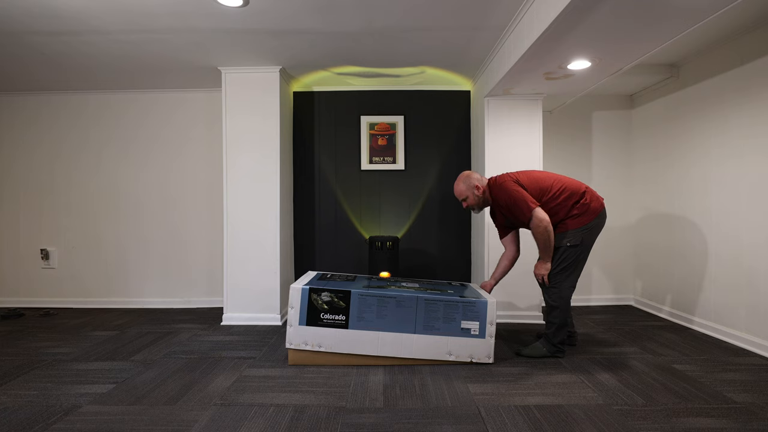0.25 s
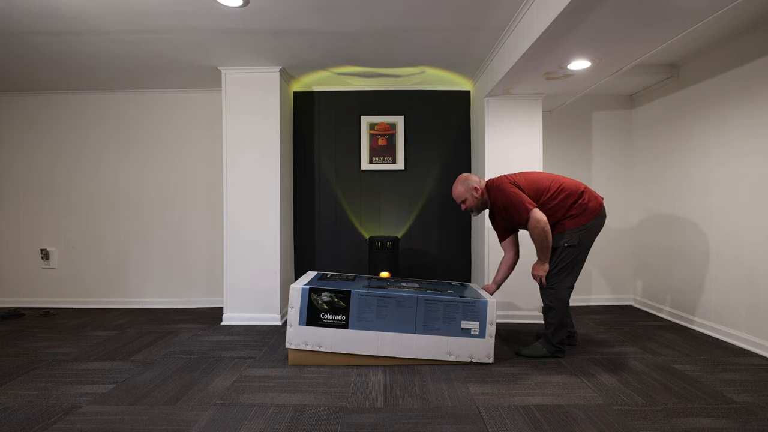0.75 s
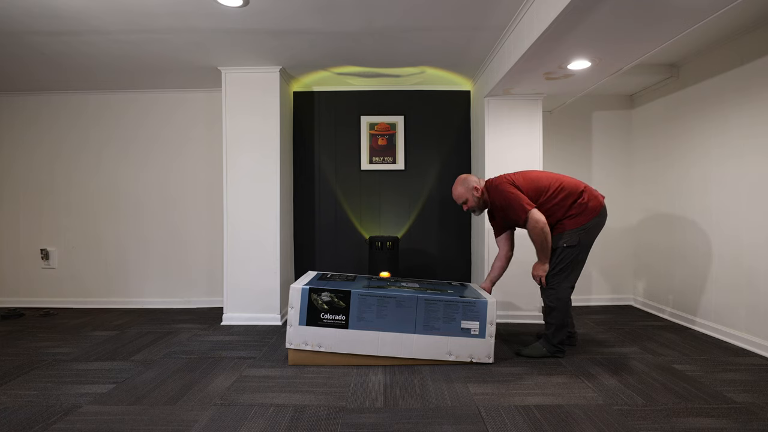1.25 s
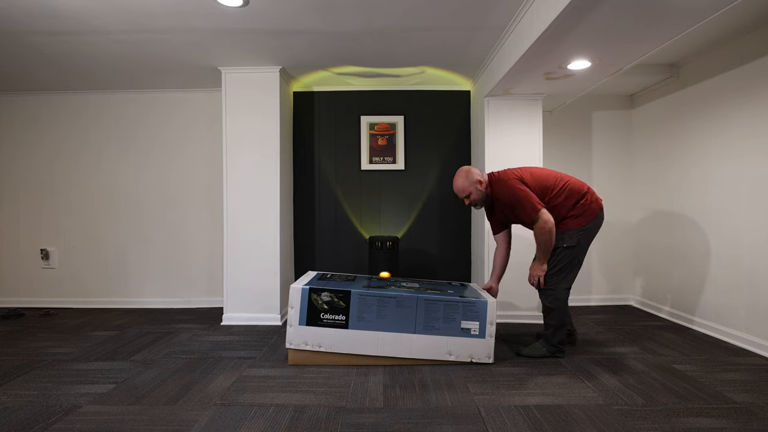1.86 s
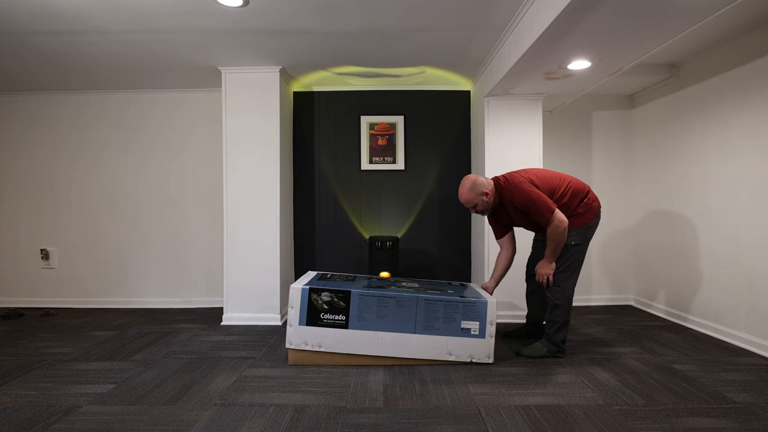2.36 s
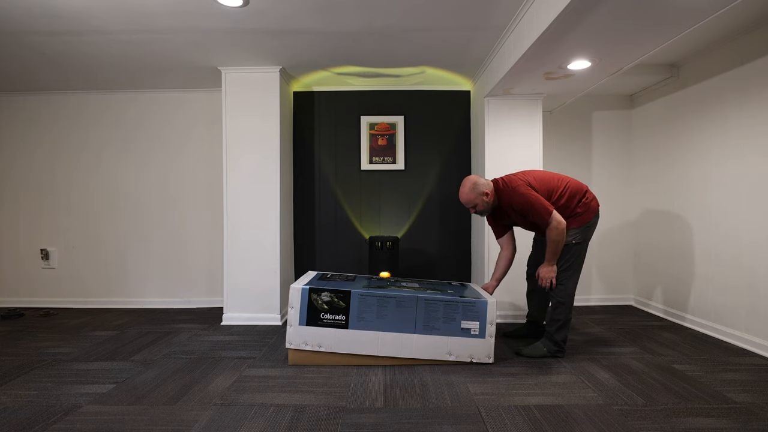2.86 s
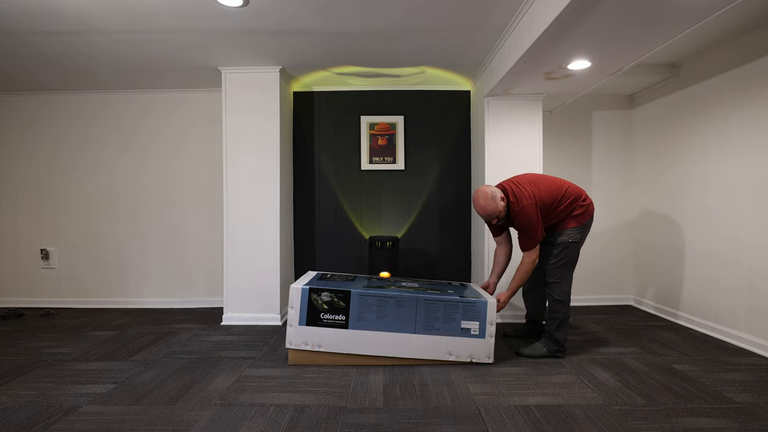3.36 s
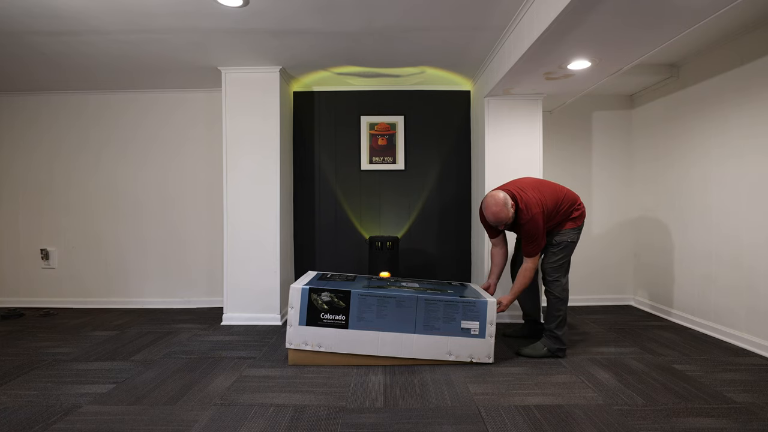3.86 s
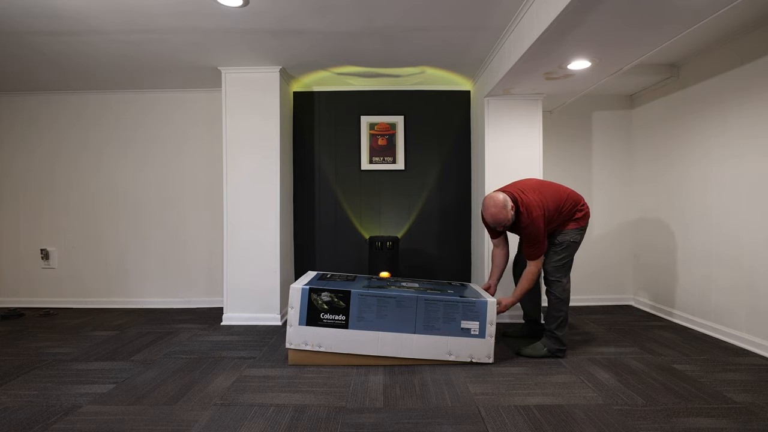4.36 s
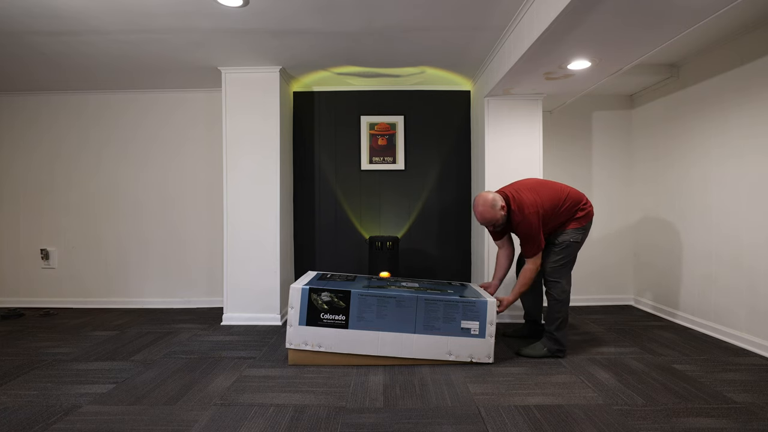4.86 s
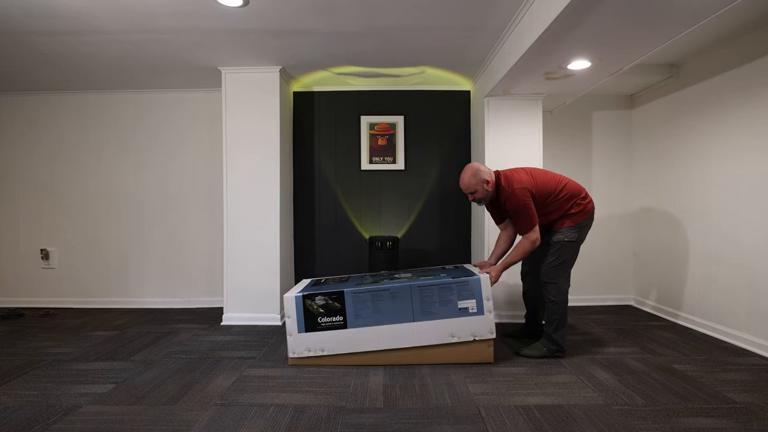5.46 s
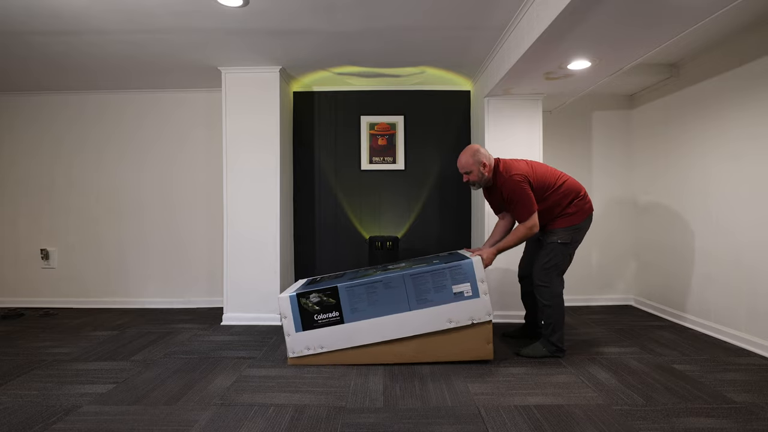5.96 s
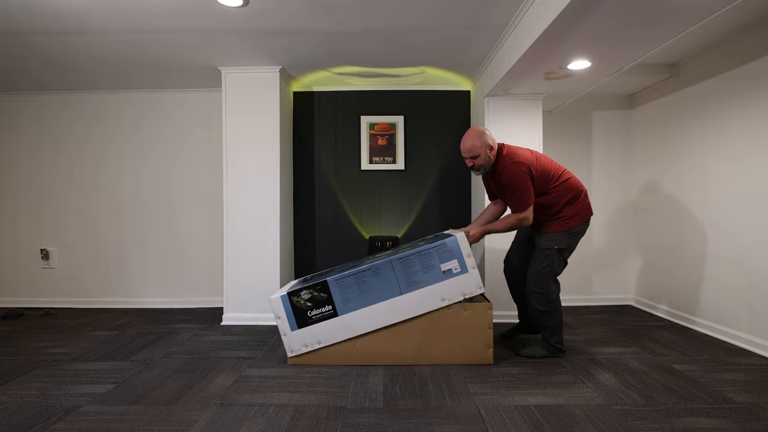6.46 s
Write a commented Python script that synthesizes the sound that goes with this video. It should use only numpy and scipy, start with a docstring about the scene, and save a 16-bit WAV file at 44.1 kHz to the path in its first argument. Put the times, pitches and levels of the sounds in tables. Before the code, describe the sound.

A large cardboard box is handled in a bare, low, carpeted room, heard from a few metres away. Uneven knocks, dry paper snaps and faint rustling come in loose clusters with quieter gaps. After about five seconds the snug lid is tugged upward in rasping jerks, with hollow booms, deep air flutter and tiny edge squeaks.

```python
"""A large cardboard box is worked open on a carpeted floor, a few metres off in a bare, low room.
Knocks, paper snaps and hollow thumps are bursts of tiny clicks ringing through damped panel modes.
Tugs on the lid, rubbing and rustling are coloured clicks; edge squeaks are short stacks of overtones.
A loose panel shudders, the lid pumps a deep flutter of air, and faint air noise and a drone lie beneath."""
import sys
import numpy as np
from scipy import signal
from scipy.fft import rfft, irfft
from scipy.io import wavfile
from scipy.ndimage import uniform_filter1d

SR = 44100
rng = np.random.default_rng(int(sys.argv[2]) if len(sys.argv) > 2 else 0)


def dump(signal):
    """Clip the signal to [-1, 1] and save it as 16-bit WAV at the path in sys.argv[1]."""
    limited = np.clip(np.atleast_2d(signal).T, -1, 1)
    pcm = np.round(limited * 32767).astype(np.int16)
    wavfile.write(sys.argv[1], SR, pcm)


N = 295911
TIME = np.arange(N) / SR

# Hands knock on a panel; buckling brings up boom, clack and crack, an edge brings up the clack:
# (time [s], contact time [s], relative level [dB], buckling [dB], extra edge clack [dB])
PANEL_KNOCKS = [(0.158, 0.0014, -27.5, 0, -2), (0.309, 0.0035, -21, 2, -2), (0.341, 0.0029, -27.5, 7.5, 5),
                (0.414, 0.0039, -20.5, -1, -1), (0.452, 0.0022, -12.5, -4, -4), (0.622, .004, -34, -7, 3),
                (0.735, 0.0022, -38, 2, -3.5), (0.843, .002, -40, -6, 5), (0.962, 0.011, -37, -10, 4),
                (1.686, .0025, -17.5, 8.5, 2), (1.824, 0.0044, -22.5, 7, -4),
                (2.222, 0.0071, -29, 1.5, -5.5), (2.258, 0.0056, -26.5, -5, 5),
                (2.508, 0.0019, -25.5, -3, -1), (2.559, 0.0045, -25, -0.5, 4.5),
                (2.672, 0.0039, -24, 3.5, -5), (2.689, 0.0027, -19.5, -1, 4),
                (3.062, 0.0058, -17.5, 5.5, -2.5), (3.367, 0.0049, -29, 8, -2),
                (3.967, 0.00084, -43.5, -6.5, 14), (4.349, 0.0051, -22, 12, -1.5),
                (4.367, 0.002, -15, -6, 4.5), (6.489, 0.0019, -12, -0.5, 0.5)]
# The paper skin snaps under a flap or a fingertip:
# (time [s], contact time [s], relative level [dB], crack brightness [dB])
PAPER_SNAPS = [(1.4352, .0003, -20.5, -0.5), (1.834, 0.0014, -25, 2.5), (2.079, 0.0011, -52, 17),
               (2.256, 0.0026, -26.5, -6), (2.632, 0.0032, -29.5, -4.5), (3.89, 0.0013, -38.5, -3.5),
               (4.05, 0.0034, -45, -6), (4.278, 0.0057, -46.5, 8), (4.572, .0019, -26.5, -13.5)]
# Lid and tray bump and the hollow box booms: (time [s], relative level [dB], hardness [dB])
LID_THUMPS = [(1.07, -38.5, -13), (2.081, -24, -1.5), (4.794, -28, -12), (4.846, -29.5, -0.5),
              (4.918, -28.5, 5.5), (5.089, -14.5, 1.5), (5.375, -18, 6.5), (5.51, -16.5, -3),
              (5.724, -14, -3), (5.921, -23, -4), (6.088, -23.5, 5), (6.113, -19.5, 6), (6.15, -18, -1),
              (6.372, -17.5, -5), (6.422, -17.5, 4.5), (6.514, -21.5, -10), (6.582, -16.5, 1)]
# Damped modes of the box: (frequency [Hz], bandwidth [Hz], relative level [dB])
BOX_MODES = [(57, 22, -13), (90, 22, -1.5), (128, 35, 0.5), (171, 52, 0.5), (210.6, 77, -2), (257.5, 39, 4),
             (327, 49, 2), (426, 38, 0.5), (512, 42, -9), (690, 110, -11.5), (840, 150, -15.5),
             (966, 200, -10.5), (1140, 135, -8.5), (1400, 210, -14), (1565, 210, -14), (1880, 170, -22)]
# Colour of cracking paper: (frequency [Hz], level [dB])
CRACK_COLOUR = [(1000, -27.5), (1650, -5.5), (2300, -1), (3100, 1.5), (4200, 2.5), (5300, -3.5),
                (6500, -0.5), (9300, -4), (12000, -11.5), (16000, -25)]
# Tugs on the lid, board sliding on board:
# (start [s], fastest [s], stop [s], relative level [dB], brightness [dB])
LID_TUGS = [(5.048, 5.112, 5.168, -14.5, -4), (5.334, 5.358, 5.5, -25, -2.5),
            (5.557, 5.584, 5.71, -24.5, -6), (5.858, 5.948, 6.07, -23.5, -2), (6.07, 6.145, 6.23, -28, -14),
            (6.17, 6.224, 6.3, -21, 1.5), (6.395, 6.469, 6.535, -17.5, 3.5)]
# Hands rub over the paper: (fastest [s], length [s], relative level [dB])
PAPER_RUBS = [(0.0, 0.11, -42), (0.14, .07, -33), (0.413, .09, -29), (1.279, .08, -43.5), (1.377, .04, -35),
              (2.367, 0.088, -36.5), (3.062, .04, -28), (3.367, 0.055, -38), (3.439, 0.14, -44),
              (4.106, 0.037, -44), (4.326, .08, -49), (4.518, .17, -35.5), (4.76, 0.12, -38.5),
              (4.898, 0.089, -39.5), (6.622, .2, -39.5)]
# Colour of the sliding rasp: (frequency [Hz], level [dB])
RASP_COLOUR = [(120, -2.5), (300, 5.5), (700, -0.5), (1500, -2.5), (2600, -2.5), (3300, -2.5), (4200, 1),
               (5300, -5), (6500, -3), (9500, -5.5), (12500, -11.5), (16000, -22)]
# Let go after a hard knock, a loose panel shudders and settles: (start [s], length [s], level [dB])
PANEL_SHUDDERS = [(0.504, .15, -39), (1.716, 0.17, -26.5), (2.71, 0.14, -31.5), (4.415, 0.13, -22)]
# Colour of the shudder: (frequency [Hz], level [dB])
SHUDDER_COLOUR = [(100, -18), (280, 4.5), (480, 2), (700, -5.5), (1300, -6.5), (1900, -24), (6000, -38)]
# A board edge squeaks: (time [s], length [s], pitch [Hz], level [dB], waver [share of pitch])
EDGE_SQUEAKS = [(3.327, 0.02, 1371, -24, 0.06), (5.62, 0.042, 4479, -38, 0),
                (5.96, 0.042, 4791, -26.5, 0.06)]
# The box shifting under the hands: (time [s], relative flexing [dB], relative rustle [dB])
BOX_HANDLING = [(0.0, -29, -38), (0.25, -41, -51), (0.55, -32.5, -39.5), (0.8, -42, -53.5),
                (1.0, -33.5, -52), (1.17, -46, -53), (1.35, -39, -53), (1.85, -33, -45), (2.15, -42, -49.5),
                (2.45, -35, -40.5), (2.95, -44, -46), (3.45, -36.5, -37), (4.22, -49.5, -57),
                (4.6, -33.5, -46), (4.98, -34, -41.5), (5.2, -36.5, -33), (5.8, -33, -36),
                (6.3, -29, -34.5), (6.7, -25, -29.5)]
# Colour of the rustle: (frequency [Hz], level [dB])
RUSTLE_COLOUR = [(200, -6.0), (600, 2), (1400, -0.5), (2600, -5.5), (4300, -9.5), (9000, -13.5), (16000, -33)]
# Colour of the still air: (frequency [Hz], level [dB])
AIR_COLOUR = [(15, -30), (25, -5), (87, -25), (263, -19), (427, -6), (1700, -9), (2350, -12), (2990, -13),
              (4250, -16.5), (16000, -24)]
# Reverberation: (frequency [Hz], time to fall 60 dB [s])
REVERB_TIMES = [(80, 0.39), (220, 0.32), (560, 0.42), (1500, 0.4), (4000, 0.36), (8000, 0.27),
                (14000, 0.19)]

# How much of the box answers each blow: (hollow thump [dB], panel knock [dB], edge clack [dB], crack [dB])
KNOCK_MIX = (-9, 0, -5.5, -10.5)
SNAP_MIX = (-40, -12.5, -3.5, -0.5)
THUMP_MIX = (0, -7, -17, -21.5)
# What each dB of buckling or hardness adds to the same four [dB per dB]
BUCKLING, HARDNESS = (1, 0, 0.65, 1), (0, 0.97, 1, 1)


def knocks(ring):
    """Each blow crushes the flutes in a short burst of clicks that drives the box and cracks the paper."""
    out = np.zeros(N + SR)
    t = TIME[:SR * 3 // 4]
    attack = SR // 25  # levels are set over the first 40 ms
    spots = [room(direct_db=-6, bounce_db=-12) for _ in range(24)]
    for s, contact, levels, bright in blows():
        age = t / max(contact, 1 / SR)
        crunch = slips(len(t), 9000, 2.08) * np.sqrt(age) * np.exp(-age)
        crunch = crunch[:SR // 8]
        # the flutes give way at several spots of the panel, each with its own echoes
        nearby = rng.permutation(len(spots))[:9]
        spot = rng.choice(nearby, len(crunch))
        burst = sum(signal.fftconvolve(crunch * (spot == k), spots[k])[:len(t)] for k in np.unique(spot))
        body = through(burst, ring)
        thump = band(body, 53.0, 206)
        knock = band(body, 223, 693)
        clack = band(body, 774, 2060)
        crack = colour(burst, CRACK_COLOUR, bright + 2.9)
        start = int(s * SR)
        for part, db in zip((thump, knock, clack, crack), levels):
            out[start:start + len(t)] += undb(db) * unit(part, attack)
    return out[:N]


def blows():
    """Knocks, snaps and thumps as (time [s], contact time [s], four levels [dB], relative brightness [dB])."""
    hits = []
    for s, contact, db, buckle, edge in PANEL_KNOCKS:
        levels = db + np.array(KNOCK_MIX) + buckle * np.array(BUCKLING) + [0, 0, edge, 0]
        hits.append((s, contact, levels, -10 + 0.92 * buckle))  # buckling brightens the crack
    for s, contact, db, bright in PAPER_SNAPS:
        hits.append((s, contact, db + np.array(SNAP_MIX), bright))
    for s, db, hard in LID_THUMPS:
        levels = db + np.array(THUMP_MIX) + hard * np.array(HARDNESS)
        hits.append((s, 0.0036, levels, -8))
    return hits


def box_ring(dead_db=-9):
    """Heavily damped panel modes over the dead tap of the board itself."""
    t = TIME[:SR // 4]
    ring = np.zeros(len(t))
    for hz, width, db in BOX_MODES:
        decay = np.exp(-np.pi * width * t)  # the wider the mode, the faster it dies
        ring += undb(db) * 2 * np.pi * width / SR * decay * np.cos(2 * np.pi * hz * t)
    ring[0] += undb(dead_db)
    return ring


def strokes(rasp_db=1, judder_db=2.5, swell=1.09):
    """The rasp of tugs, rubs and scuffs follows the sliding speed, and judders as the grip varies."""
    out = np.zeros(N)
    grip = undb(judder_db * walk(110))
    rise, rub_bright_db = 0.42, 1.5  # share of a rub spent speeding up; treble lift
    rubs = [(s - rise * length, s, s + (1 - rise) * length, db, rub_bright_db)
            for s, length, db in PAPER_RUBS]
    # the hand scuffs the paper into and out of each knock
    reach_s, scuff_db = 0.016, -15  # time either side; level against the knock's
    scuffs = [(s - reach_s, s, s + reach_s, db + scuff_db, 0) for s, _, db, _, _ in PANEL_KNOCKS]
    for start, fastest, stop, db, bright in LID_TUGS + rubs + scuffs:
        speed = np.interp(TIME, [start, fastest, stop], [0, 1, 0])
        on = speed > 0
        rasp = unit(colour(slips(on.sum(), 7000, 3.75), RASP_COLOUR, bright))
        out[on] += undb(db + rasp_db) * speed[on] ** swell * rasp
    return out * grip


def shudders(fade_db=9):
    """A loose panel chatters against the tray as dull, fading clicks."""
    level = np.zeros(N)
    for s, length, db in PANEL_SHUDDERS:
        on = (TIME > s) & (TIME < s + length)
        progress = np.clip((TIME - s) / length, 0, 1)
        level += on * undb(db - fade_db * progress)
    return level * unit(colour(slips(N, 900, 3.0), SHUDDER_COLOUR))


def squeaks():
    """Stick-slip locks briefly into a pitch with overtones, wavering where the table says so."""
    out = np.zeros(N)
    drift = walk(900)
    for s, length, hz, db, waver in EDGE_SQUEAKS:
        on = (TIME > s) & (TIME < s + length)
        phase = 2 * np.pi * np.cumsum(hz * (1 + waver * drift[on])) / SR
        # the nearly square slip favours odd harmonics
        harmonics = np.arange(1, 11000 / hz)
        tone = sum((1 + k % 2) * np.sin(k * phase) / k ** 0.71 for k in harmonics)
        out[on] += undb(db) * unit(tone) * np.sqrt(np.hanning(on.sum()))
    return out


def handling(ring, flex_db=-2, rustle_db=-4, flutter_db=1.5):
    """Panels flex with a low grumble of clicks in the box while fingers and sleeves rustle over the paper."""
    s, flex_curve, rustle_curve = np.transpose(BOX_HANDLING)
    flex = undb(flex_db + np.interp(TIME, s, flex_curve))
    rustle = undb(rustle_db + np.interp(TIME, s, rustle_curve))
    boxed = through(slips(N, 500, 3.4), ring)
    grumble = unit(band(band(boxed, 27, 1600), 45, 590, order=1))
    crinkle = unit(colour(slips(N, 1500, 4.2), RUSTLE_COLOUR))
    return (flex * grumble + rustle * crinkle) * undb(flutter_db * walk(25))


def lid_draught(db=-32, lag_s=0.15):
    """Each tug pumps air between lid and tray: deep noise that lingers past the stroke."""
    speed = sum(np.interp(TIME, [start, fastest, stop + lag_s], [0, 1, 0])
                for start, fastest, stop, _, _ in LID_TUGS)
    return undb(db) * speed * unit(band(rng.standard_normal(N), 24, 77, order=2))


def still_room(db=-51, hum_hz=85, hum_db=-52):
    """Faint coloured air noise and a low drone of narrow-band noise."""
    air = unit(colour(rng.standard_normal(N), AIR_COLOUR))
    drone = unit(band(rng.standard_normal(N), hum_hz - 4, hum_hz + 4, order=2))
    return undb(db) * air + undb(hum_db) * drone


def room(direct_db=-7, bounce_db=-11, bounce_s=.0075, build_s=0.00037):
    """Direct sound, a bounce off the low ceiling, and a diffuse tail whose top treble dies soonest."""
    t = TIME[:SR * 3 // 4]
    hz = np.fft.rfftfreq(len(t), 1 / SR)
    noise = rfft(rng.standard_normal(len(t)))
    centres, t60s = np.transpose(REVERB_TIMES)
    tail = np.zeros(len(t))
    # overlapping bands of one noise, each with its own decay
    for share, t60 in zip(np.eye(len(centres)), t60s):
        band_noise = irfft(noise * lookup(np.c_[centres, share], hz), len(t))
        tail += band_noise * np.exp(-np.log(1000) * t / t60)
    tail *= 1 - np.exp(-t / build_s)
    tail /= np.linalg.norm(tail)
    # direct and bounce levels are relative to the tail
    tail[0] += undb(direct_db)
    tail[int(bounce_s * SR * rng.uniform(.75, 1.25))] += undb(bounce_db)
    return tail / np.linalg.norm(tail)


def slips(count, per_s, spread_db):
    """Fibres catching and letting go: random clicks of uneven size."""
    size = undb(spread_db * np.minimum(rng.exponential(size=count), 5))
    caught = rng.random(count) < per_s / SR
    return unit(size * rng.standard_normal(count) * caught)


def walk(per_s):
    """Slow smoothed chance, scaled to rms 1."""
    k = int(SR / per_s)
    steps = np.repeat(rng.standard_normal(N // k + 1), k)[:N]
    return unit(uniform_filter1d(steps, k))


def colour(x, points, bright_db=0, size=2048):
    """Minimum-phase filter of the given spectrum, with a treble shelf."""
    hz = np.fft.rfftfreq(size, 1 / SR)
    shelf = bright_db / (1 + (5800 / (hz + 1)) ** 4)
    cepstrum = irfft(np.log(undb(lookup(points, hz) + shelf)))
    # folding the cepstrum makes the filter causal
    cepstrum[1:size // 2] *= 2
    cepstrum[size // 2 + 1:] = 0
    return through(x, irfft(np.exp(rfft(cepstrum))))


def undb(db):
    """Decibels to gain."""
    return 10 ** (np.asarray(db) / 20)


def unit(x, count=None):
    """Scale to rms 1 over the first count samples, or over all of them."""
    return x / np.sqrt(np.mean(x[:count] ** 2) + 1e-18)


def band(x, lo_hz, hi_hz, order=3):
    """Band-pass."""
    edges = [lo_hz, min(hi_hz, .48 * SR)]
    return signal.sosfilt(signal.butter(order, edges, "band", fs=SR, output="sos"), x)


def lookup(points, hz):
    """Read (frequency [Hz], value) points on a log-frequency axis."""
    f, value = np.transpose(points)
    return np.interp(np.log(hz + 1), np.log(f), value)


def through(x, response):
    """Convolve, keeping the length."""
    return signal.fftconvolve(x, response)[:len(x)]


def scene():
    """Blows and rubbing are heard through the room; draught, air and drone are laid in without echoes."""
    ring = box_ring()
    close = strokes() + squeaks() + handling(ring) + shudders()
    rubbing = np.zeros(N + SR)
    hop = SR // 40
    spots = [room() for _ in range(16)]
    fade = signal.windows.cosine(2 * hop)
    # the contact point keeps moving, so the pattern of echoes keeps changing
    for k, i in enumerate(range(0, N, hop)):
        piece = close[i:i + 2 * hop]
        wet = signal.fftconvolve(piece * fade[:len(piece)], spots[k % len(spots)])
        rubbing[i:i + len(wet)] += wet
    return (knocks(ring) + rubbing[:N] + lid_draught() + still_room())[None]


def record(dry):
    """Peaks beyond full scale are clipped, then a steep low-pass cuts the top."""
    top_hz = 16000
    low_pass = signal.ellip(10, .2, 70, top_hz, fs=SR, output="sos")
    return signal.sosfilt(low_pass, np.clip(dry, -1, 1))


dry = scene()
out = record(dry)
dump(out)
```